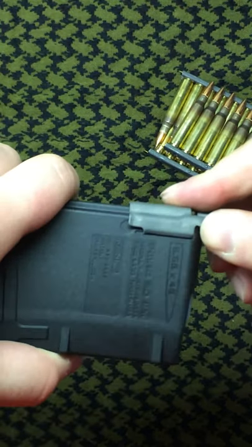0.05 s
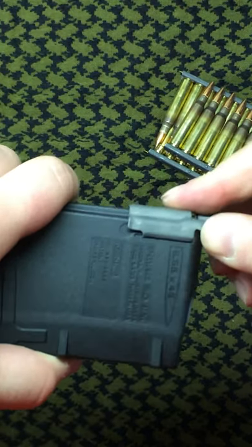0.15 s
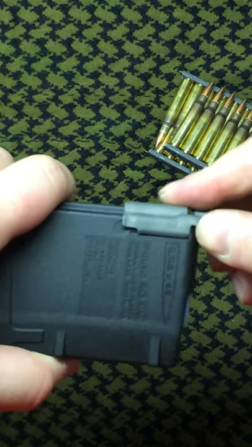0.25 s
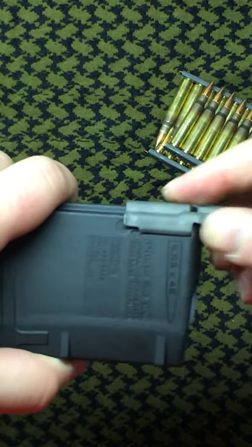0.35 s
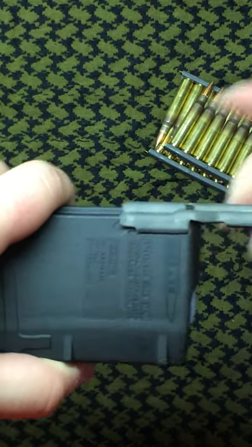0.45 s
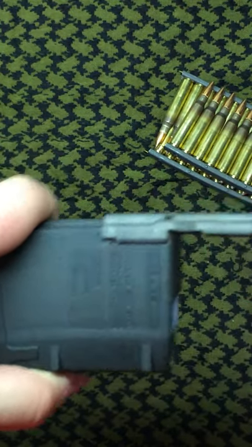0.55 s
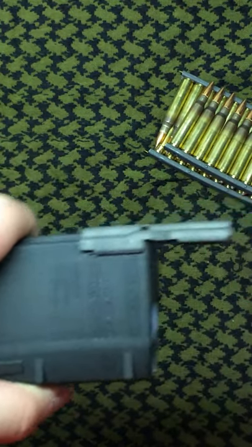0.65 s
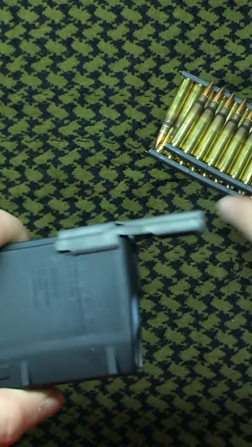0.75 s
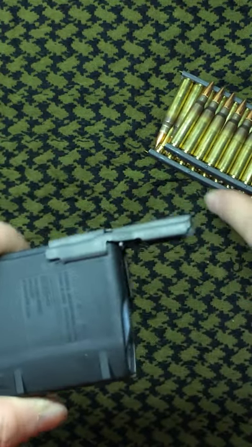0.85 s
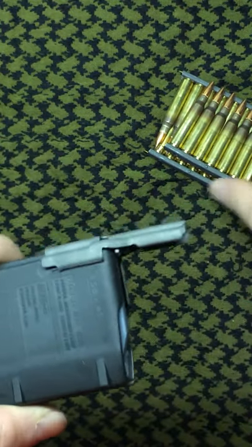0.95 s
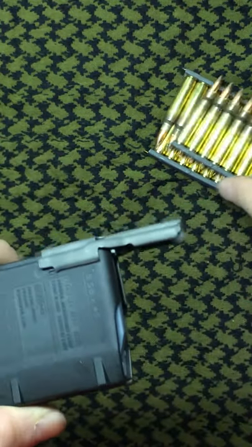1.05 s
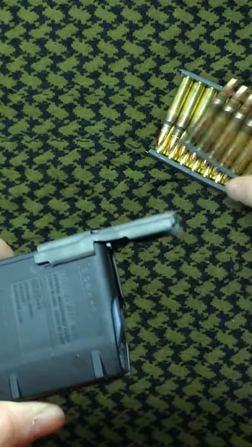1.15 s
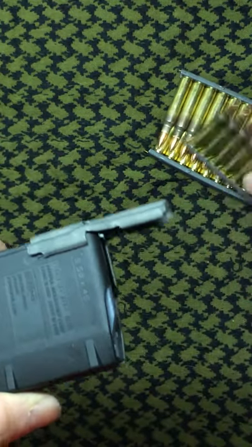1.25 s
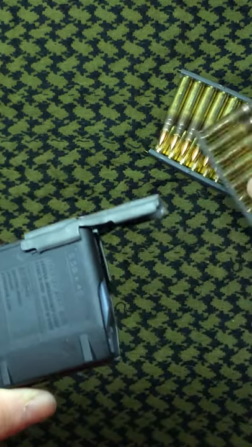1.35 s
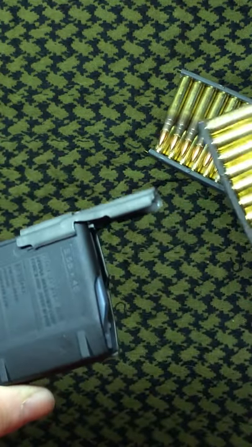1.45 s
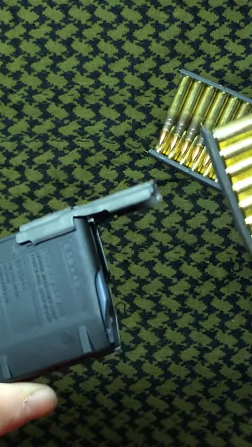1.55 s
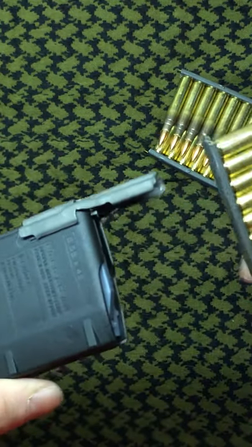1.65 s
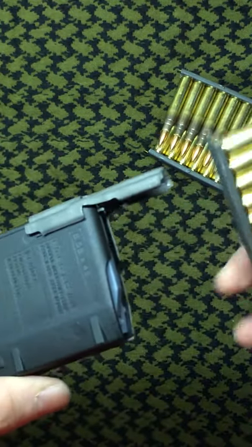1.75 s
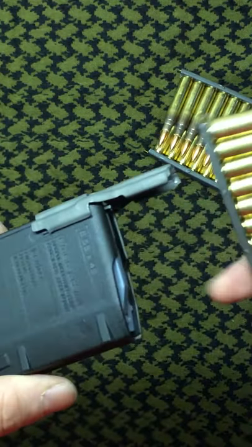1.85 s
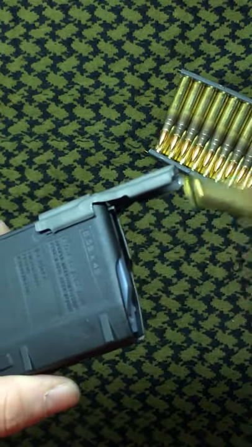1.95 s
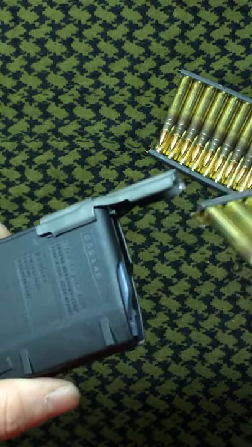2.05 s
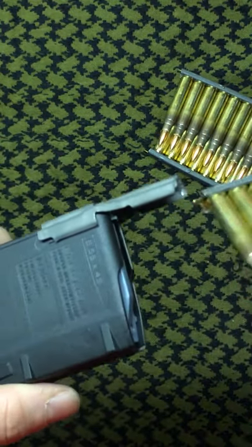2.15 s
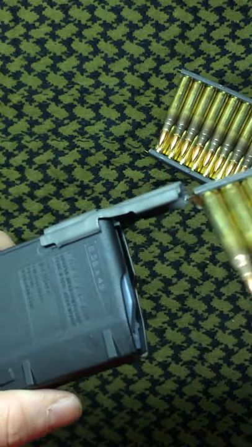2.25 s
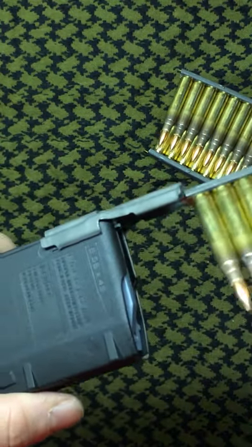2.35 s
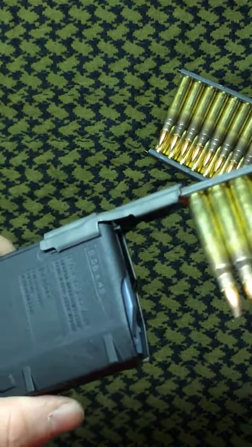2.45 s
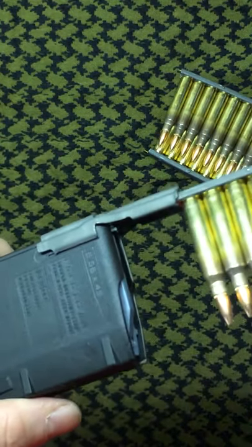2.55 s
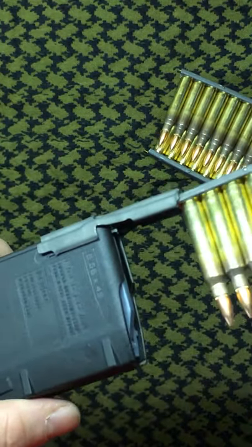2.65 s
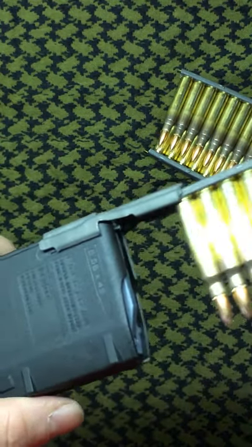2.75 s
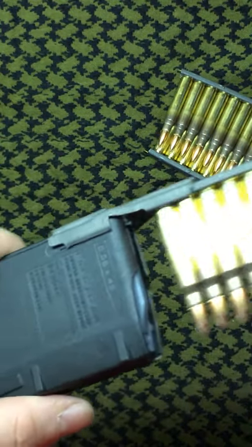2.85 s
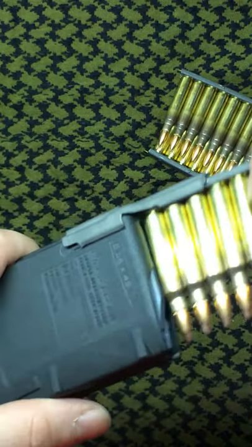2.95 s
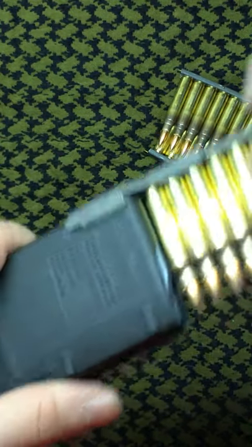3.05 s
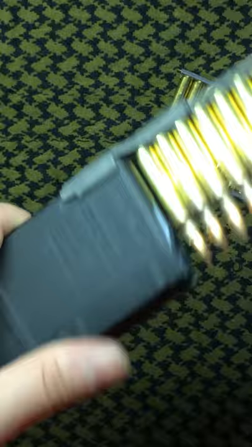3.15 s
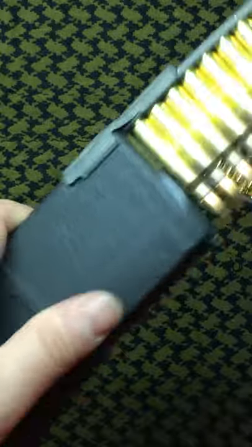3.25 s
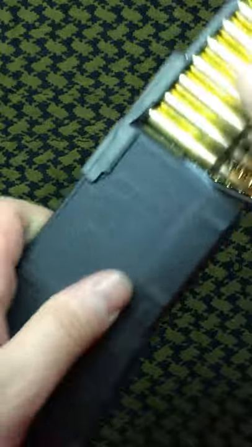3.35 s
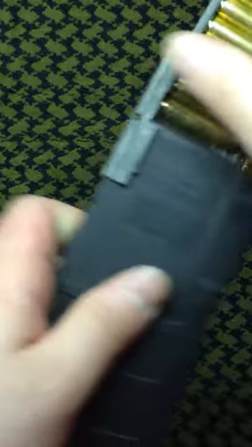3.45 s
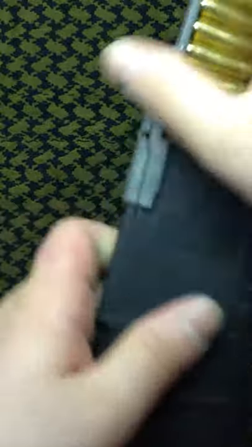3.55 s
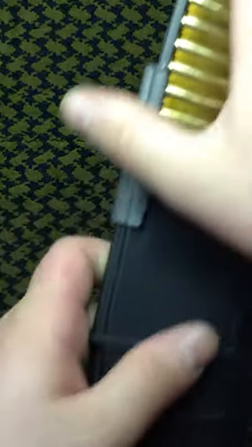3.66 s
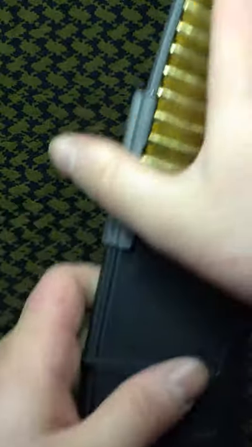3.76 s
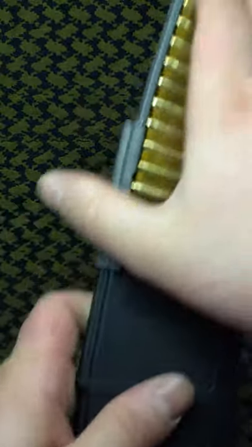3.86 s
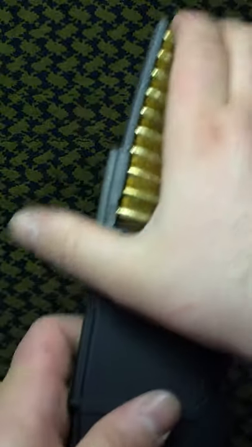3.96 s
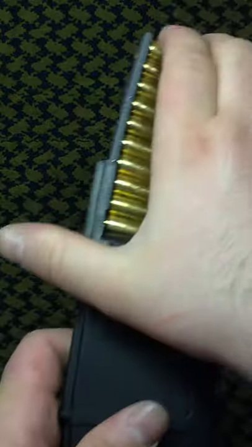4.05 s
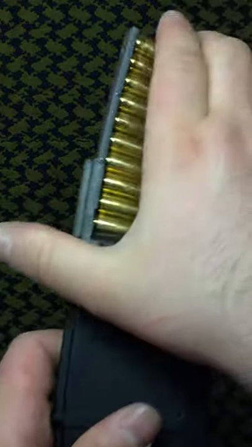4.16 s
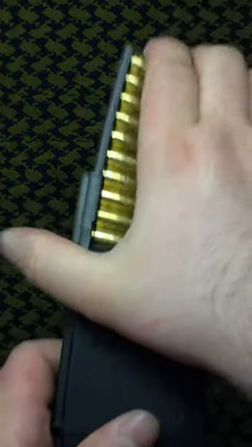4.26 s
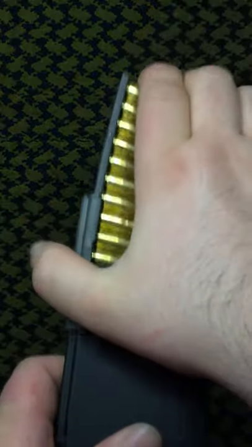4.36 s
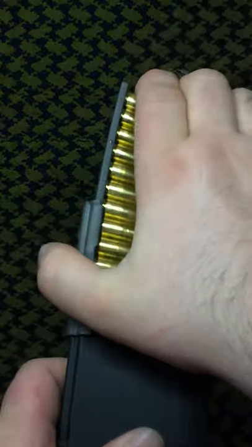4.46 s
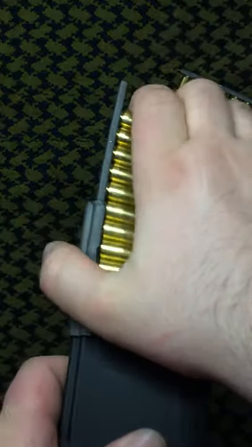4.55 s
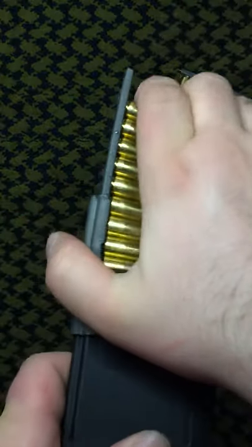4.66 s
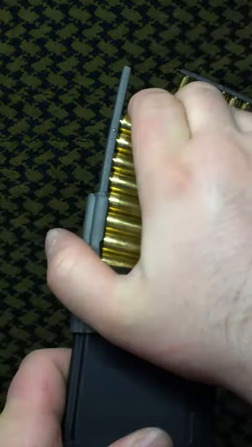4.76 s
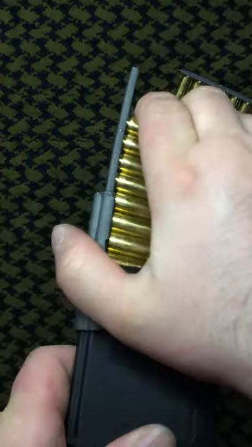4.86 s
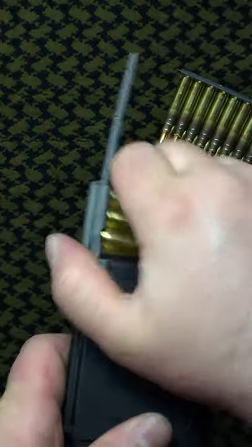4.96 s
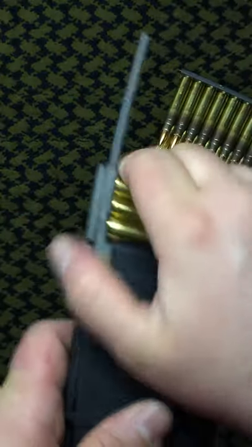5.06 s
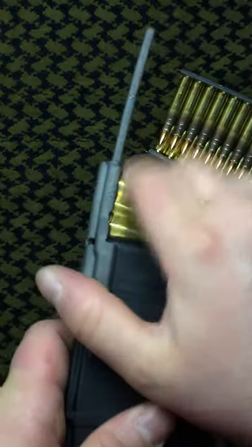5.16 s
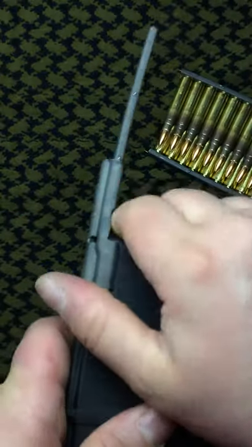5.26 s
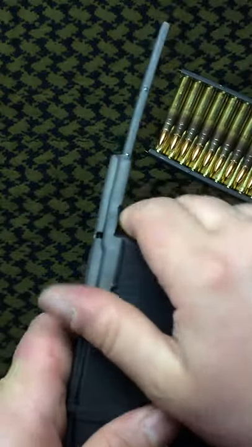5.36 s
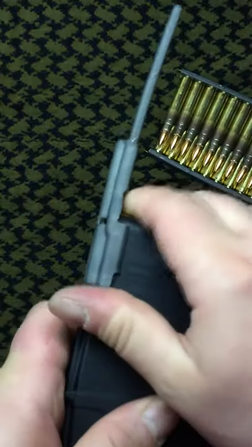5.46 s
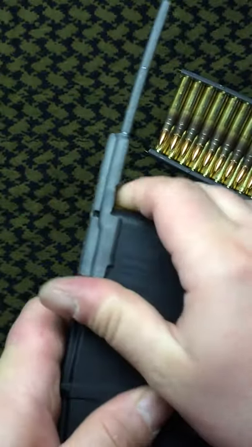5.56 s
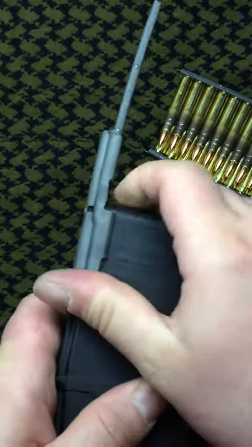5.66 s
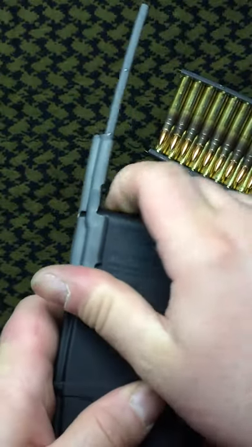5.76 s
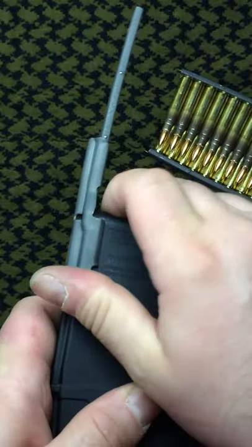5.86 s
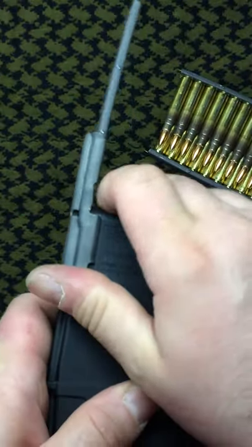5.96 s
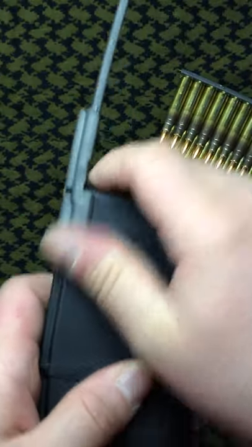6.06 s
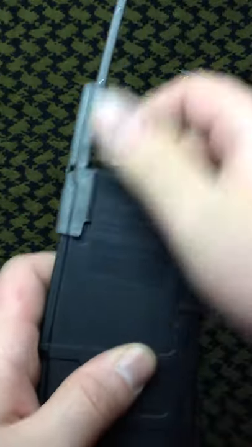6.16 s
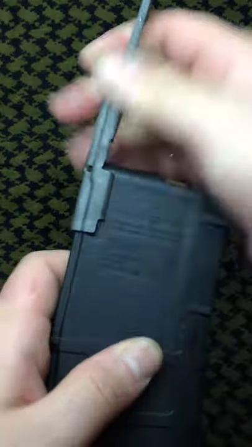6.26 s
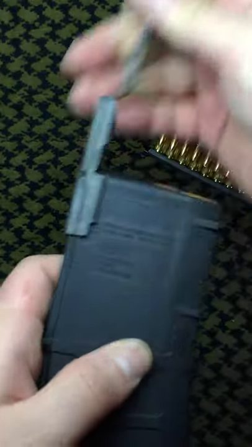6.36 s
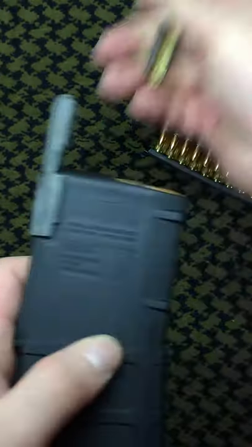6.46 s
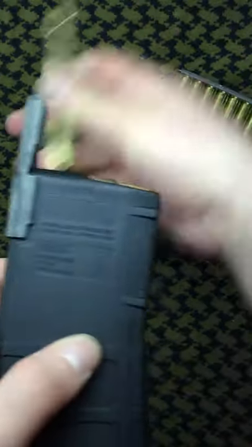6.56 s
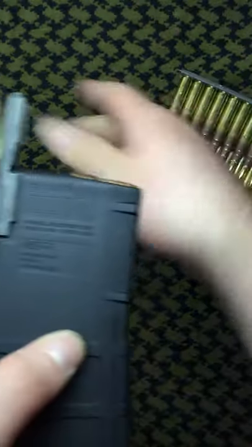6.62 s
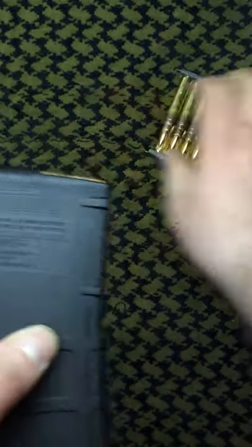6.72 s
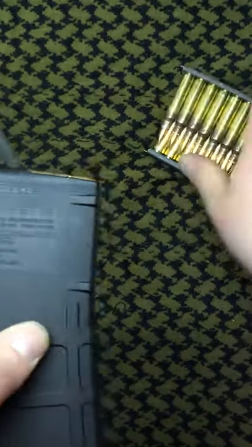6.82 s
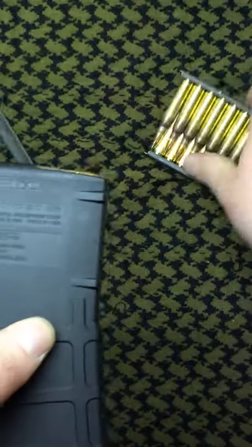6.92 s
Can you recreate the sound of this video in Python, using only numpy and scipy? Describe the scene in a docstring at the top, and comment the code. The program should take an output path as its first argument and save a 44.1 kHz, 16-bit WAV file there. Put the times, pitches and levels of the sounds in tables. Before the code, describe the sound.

Very close, in a small cloth-damped room with a low steady fan hum, hands handle a hollow plastic magazine. Faint ticks lead to a small tap and a firm double clack as a cartridge strip seats in a guide. After a quiet pause, cartridges are shoved down in several hard, bright, rattling snaps with dull thumps. One more crisp snap and light metallic clicks end it.

```python
"""Close to the microphone, hands press brass cartridges off a strip in a steel guide into a plastic magazine.
Each contact is a blow and a short chatter that ring the hollow magazine shell and the brass and steel.
Low thuds are damped sine swings of the body; slides and creaks are gritty noise in the same resonances.
Behind them a fan hums, made of a tone and noise bands, in a small cloth-damped room with a diffuse tail.
A limiter ducks the room after the loudest snaps."""
import sys
import numpy as np
from scipy import signal
from scipy.fft import rfft, irfft, next_fast_len
from scipy.io import wavfile
from scipy.ndimage import uniform_filter1d, minimum_filter1d, map_coordinates

SR = 44100
rng = np.random.default_rng(int(sys.argv[2]) if len(sys.argv) > 2 else 0)


def master(y):
    """Save y as 16-bit WAV."""
    cut = np.clip(np.atleast_2d(y).T, -1, 1)
    pcm = np.round(cut * 32767)  # scale
    wavfile.write(sys.argv[1], SR, pcm.astype(np.int16))


N = 308259  # samples, about 7 s

# contacts of hand, brass, steel and magazine, levels as short-term peaks ahead of the limiter:
# (time [s], shell level [dB], brass level [dB], centre of the struck shell modes [Hz])
CONTACTS = [(0.834, -54, -49.5, 1670), (1.118, -59, -52, 3600), (1.154, -51, -49, 4200),
            (1.213, -41.5, -47.5, 4200), (1.257, -39.5, -52, 3730), (1.266, -42, -55, 3630),
            (1.337, -49, -60, 3400), (1.366, -51, -63, 3200), (1.48, -68, -61, 3600),
            (2.091, -62, -48, 3000), (2.428, -24, -40, 1720), (2.482, -43, -60, 1520),
            (2.491, -38.5, -67, 1770), (2.529, -37, -42, 1680), (2.534, -29.5, -42, 1570),
            (2.542, -30, -48, 1700), (3.006, -9.5, -20, 2370), (3.019, -7, -29, 1480),
            (3.029, -31, -29, 2400), (3.036, -28, -48, 1630), (3.043, -26, -50, 2110),
            (3.053, -42, -56, 2200), (3.174, -18, -33.5, 1600), (3.182, -23.5, -36, 1970),
            (3.223, -38, -56, 1820), (3.728, -30.5, -37.5, 1540), (3.808, -42, -67, 2000),
            (3.887, -45, -60, 1260), (3.968, -42.5, -50.5, 1320), (4.453, -38.5, -75, 1460),
            (4.635, -21, -26.5, 1820), (4.646, 1, -7, 1910), (4.657, -9, -19, 2390),
            (4.798, -12.5, -24.5, 1850), (4.803, -13.5, -22.5, 1970), (4.813, 3, -7, 1940),
            (4.996, -40, -38, 2000), (5.017, 6, 3.5, 1830), (5.027, 7, 9, 2560), (5.036, 9, 8, 2000),
            (5.048, 8.5, 5, 1910), (5.089, -4, -16, 2030), (5.243, -37.5, -34, 2220), (5.265, 5, 8, 2380),
            (5.279, 8.5, 2, 2270), (5.286, 1, 3, 1910), (5.294, 4.5, 3, 2040), (5.302, 3, -1.5, 2360),
            (5.371, -19.5, -35.5, 2100), (5.425, -24, -42, 2180), (5.499, -39, -45, 1368),
            (5.813, -24, -49.5, 1860), (5.868, -38.5, -58, 1820), (5.937, -39.5, -47.5, 1990),
            (5.959, -0.5, -4, 2280), (5.97, -13, -25, 2210), (6.099, -40, -52, 1980),
            (6.176, -41, -45, 1900), (6.225, -41, -44, 3140), (6.278, -42, -40, 1900),
            (6.29, -39, -36, 2240), (6.307, -58, -47, 2240), (6.327, -20.5, -22, 2420),
            (6.357, -21.5, -23.5, 2150), (6.378, -17.5, -7.5, 2070), (6.385, -17.5, -30, 2170),
            (6.427, -26, -32.5, 2410), (6.458, -17.5, -26, 1880), (6.77, -47.5, -36.5, 2560)]
# resonances of the hollow magazine shell: (frequency [Hz], width [Hz], relative level [dB])
SHELL_MODES = [(800, 990, -7.5), (1050, 210, 3), (1226, 290, 1.5), (1460, 200, 4), (1570, 260, 1.5),
               (1910, 230, 6), (2220, 627, 4), (2360, 240, 5.5), (2544, 82, -1.5), (3000, 810, 4),
               (3297, 950, 1), (4100, 740, 0.5), (4370, 1300, -7)]
# resonances of the cartridges and steel strip: (frequency [Hz], width [Hz], relative level [dB])
BRASS_MODES = [(4520, 900, 0), (5850, 1200, -1), (6800, 1300, -1), (7800, 1300, 0), (9000, 1500, 0),
               (10900, 1700, 0), (12100, 1700, 0), (13500, 2000, 0), (14800, 2000, -5)]


def amp(db):
    """dB to gain."""
    return 10 ** (np.asarray(db) / 20)


def unit(x):
    """Scale to rms 1."""
    return x / np.sqrt(np.mean(x ** 2) + 1e-20)


def along(points, hz):
    """Interpolate (Hz, value) points on a log frequency axis."""
    point_hz, value = np.transpose(points)
    return np.interp(np.log(hz + 1), np.log(point_hz + 1), value)


def filtered(x, response):
    """Multiply the spectrum of x by a response of frequency, with zero padding."""
    m = next_fast_len(x.shape[-1] + 8192)
    spectrum = rfft(x, m) * response(np.fft.rfftfreq(m, 1 / SR))
    return irfft(spectrum, m)[..., :x.shape[-1]]


def modes(table, centre_hz, octaves, scatter_db=2):
    """Causal resonances of a body, favoured near the centre, their strengths scattered at each call."""
    def response(f):
        luck = scatter_db * rng.standard_normal(len(table))
        total = 0
        for k, (hz, width, db) in enumerate(table):
            distance = np.log2(hz / centre_hz) / octaves
            strength = (-1) ** k * amp(db + luck[k] - 4.16 * distance ** 2)  # alternating sign
            total = total + strength * 1j * f * width / (hz * hz - f * f + 1j * f * width)
        return total
    return response


def fan():
    """A slowly wavering motor tone and noisy duct resonances over broad air noise."""
    # duct resonances: (frequency [Hz], width at half amplitude [Hz], level [dB rms])
    duct_bands = [(79.8, 13, -53), (114.4, 7.6, -50), (149.3, 16, -51.5), (177.3, 6.5, -50),
                  (355, 140, -57.5), (702.3, 29, -65.5), (944, 61, -65)]
    # spectrum of the room air: (frequency [Hz], relative level [dB])
    air_spectrum = [(15, -62), (25, -24), (35, -22), (48, -4.5), (86, -10.5), (165, -10), (188, -17),
                    (210, -24), (360, -22.5), (948, -27), (6950, -47), (12600, -54), (15600, -52.5)]
    motor_hz, motor_db, air_db = 59.8, -46, -47  # levels in dB rms, the motor's before its waver
    t = np.arange(N) / SR
    waver = map_coordinates(rng.standard_normal(40), [t * 5])  # 5 random points a second
    motor = np.sqrt(2) * amp(motor_db + 1.4 * waver) * np.sin(2 * np.pi * motor_hz * t)

    def band(centre, width):
        """Noise through one narrow duct resonance."""
        return unit(filtered(rng.standard_normal(N), lambda f: 1 / (1 + (2 * (f - centre) / width) ** 2)))

    hum = sum(amp(db) * band(hz, width) for hz, width, db in duct_bands)
    air = unit(filtered(rng.standard_normal(N), lambda f: amp(along(air_spectrum, f))))
    return motor + hum + amp(air_db) * air


def room(x):
    """The walls return a diffuse noise tail of energy 1, each frequency dying at its own speed."""
    # decay of the cloth-damped room: (frequency [Hz], time to fall 60 dB [s])
    decay = [(300, 0.23), (2000, .14), (6000, 0.2), (15000, 0.1)]
    hz, t, z = signal.stft(rng.standard_normal(SR // 4), SR, nperseg=256)
    fade = amp(-60 * t / along(decay, hz)[:, None])
    tail = signal.istft(z * fade, SR, nperseg=256)[1]
    return signal.fftconvolve(x, tail / np.linalg.norm(tail))


def rubs():
    """Skin, brass and steel slide, and creak before a snap: gritty noise in the shell and brass modes."""
    # slides: (start [s], length [s], shell level [dB], fizz level [dB], centre of the rubbed shell modes [Hz])
    slides = [(1.103, 0.21, -76, -69, 3600), (1.328, 0.04, -59.5, -61, 3600),
              (2.527, 0.0051, -42, -50.5, 1900), (2.859, 0.18, -48.5, -58, 1800),
              (3.011, 0.025, -31, -39, 2740), (3.409, 0.26, -61.5, -57, 2320),
              (3.75, 0.014, -53, -60, 2330), (4.626, .012, -34, -50, 1900), (5.021, .035, -5, -17, 2150),
              (5.096, .09, -44.5, -44.5, 2550), (5.269, 0.023, -2, -7.5, 2200),
              (6.311, .016, -42.5, -58, 2350), (6.356, .05, -47, -49, 2216),
              (6.422, .045, -33.5, -29, 2880)]
    # a slide swells over a share of its length, stops, and a shiver dies after it
    rise_share, shortest_stop_s, stop_db, shiver_db_per_s = .2, 0.0094, 26, 247.5
    # strain swells into each contact above a shell level; creak levels are relative to that contact
    creak_over_db, creak_db, creak_fizz_db, creak_db_per_s = -6, -35, -46, 900.5
    out, t = np.zeros(N), np.arange(N) / SR
    # roughness: a random level with a new point every 60 samples
    grit = amp(2.2 * map_coordinates(rng.standard_normal(N // 60 + 4), [np.arange(N) / 60]))
    fizz_modes = modes(BRASS_MODES, 9500, octaves=1.2, scatter_db=0)
    fizz = unit(filtered(grit * rng.standard_normal(N), fizz_modes))

    def add(span, shape_db, shell_db, fizz_db, hz):
        """One sound over a stretch of time; a harder rub wakes more modes."""
        spread = np.interp(shell_db, [-50, -30], [.5, .8])  # octaves
        noise = grit[span] * rng.standard_normal(span.sum())
        shell = unit(filtered(noise, modes(SHELL_MODES, hz, spread, scatter_db=0.5)))
        out[span] += amp(shape_db) * (amp(shell_db) * shell + amp(fizz_db) * fizz[span])

    for s, length, shell_db, fizz_db, hz in slides:
        start = s - rise_share * length
        stop = s + length + max(shortest_stop_s, rise_share * length)
        span = (t > start) & (t < stop + .3)
        shape_db = np.interp(t[span], [start, s, s + length, stop, stop + 1],
                             [-30, 0, 0, -stop_db, -stop_db - shiver_db_per_s])
        add(span, shape_db, shell_db, fizz_db, hz)
    for s, db, _, hz in CONTACTS:
        if db > creak_over_db:
            span = (t > s - .06) & (t < s)
            add(span, creak_db_per_s * (t[span] - s), db + creak_db, db + creak_fizz_db, hz)
    return out


def thuds():
    """Heavily damped sine swings of the hollow magazine in the hand; a higher pitch dies faster."""
    # dull thuds under hard contacts, level ahead of the damping: (time [s], level [dB], pitch [Hz])
    body_thuds = [(2.428, -22, 800), (2.534, -31.5, 800), (3.006, -16, 905), (3.019, -24.5, 460),
                  (3.175, -27, 720), (4.646, -23, 405), (4.813, -18, 450), (5.036, -4.5, 446.5),
                  (5.959, -29, 417), (6.379, -22, 543)]
    # the column bottoms out, level ahead of each mode's own: (time [s], level [dB])
    thumps = [(5.016, -16.5), (5.029, -8), (5.048, -10), (5.264, -6.5), (5.278, 3), (5.293, 3.5)]
    # swings in every such thump: (frequency [Hz], relative level [dB])
    thump_modes = [(100, -1), (220, -7.5), (450, -4)]
    out, t = np.zeros(N), np.arange(SR // 20) / SR
    swings = body_thuds + [
        (s, db + mode_db, hz) for s, db in thumps for hz, mode_db in thump_modes]
    for s, db, hz in swings:
        swing = np.sin(2 * np.pi * hz * t) * np.exp(-(110 + 0.33 * hz) * t)
        out[round(s * SR):][:len(t)] -= amp(db) * swing
    return out


def clicks():
    """A contact is a sharp blow and a few milliseconds of chatter that ring the shell and the brass."""
    # a harder contact chatters longer: (shell level [dB], 60 dB decay ahead of each part's length factor [ms])
    chatter_decay = [(-12.5, 23), (-6.5, 36.2)]
    brass_hz = 7600  # centre of the brass modes a contact wakes
    shell_room_db, brass_room_db = -12.5, -12.5  # how much of each the walls return
    out, t = np.zeros(N + SR), np.arange(SR // 12) / SR
    blow = 1. * (t == 0)
    for s, shell_db, brass_db, shell_hz in CONTACTS:
        spread = np.interp(shell_db, [-25, 0], [.42, .82])  # octaves: a harder blow wakes more modes
        t60_ms = np.interp(shell_db, *np.transpose(chatter_decay))
        # level, resonances, chatter length factor, strength of the blow, room level
        parts = ((shell_db, modes(SHELL_MODES, shell_hz, spread), .75, 7, shell_room_db),
                 (brass_db, modes(BRASS_MODES, brass_hz, octaves=0.74), 1.05, 2.5, brass_room_db))
        hit = echo = 0
        for db, ring, length, sharp, room_db in parts:
            envelope = (1 - np.exp(-t / .0003)) * amp(-60000 * t / (length * t60_ms))
            chatter = envelope * rng.standard_normal(len(t))
            clack, colour = filtered(np.array([chatter + sharp * blow, blow]), ring)
            # level over the loudest 1.5 ms
            clack = amp(db) * clack / np.sqrt(2 * uniform_filter1d(clack ** 2, size=66).max())
            hit = hit + clack
            # the walls blur the chatter: only its colour and energy go to the room
            echo = echo + amp(room_db) * colour * np.linalg.norm(clack) / np.linalg.norm(colour)
        wet = room(echo)
        out[round(s * SR):][:len(t)] += hit
        out[round(s * SR) + 200:][:len(wet)] += wet  # the walls answer 4.5 ms later
    return out[:N]


def scene():
    """Everything at the microphone."""
    return (fan() + rubs() + thuds() + clicks())[None]


def record(dry):
    """Limiter that ducks at once, holds for 0.3 s and glides back; then hiss, soft clip and band limit."""
    top_hz, threshold_db = 15500, -2.5
    level = np.sqrt(2 * np.abs(uniform_filter1d(dry ** 2, size=88)))
    need = np.minimum(1, amp(threshold_db) / (level + 1e-9))
    hold = round(.3 * SR)
    # the window lies in the past but for 60 samples of look-ahead
    held = minimum_filter1d(np.log(need), 2 * (hold // 2) + 1, origin=hold // 2 - 60, mode="nearest")
    fall = np.exp(-1 / (0.033 * SR))  # 33 ms glide
    glide = signal.lfilter([1 - fall], [1, -fall], held)
    gain = np.exp(np.minimum(uniform_filter1d(held, size=60), glide))
    x = dry * gain + amp(-70) * rng.standard_normal(N)  # the electronics hiss after the limiter
    x = x / (1 + np.abs(x) ** 8) ** (1 / 8)
    return filtered(x, lambda hz: 1 / (1 + (hz / top_hz) ** 100))


dry = scene()
out = record(dry)
master(out)
```